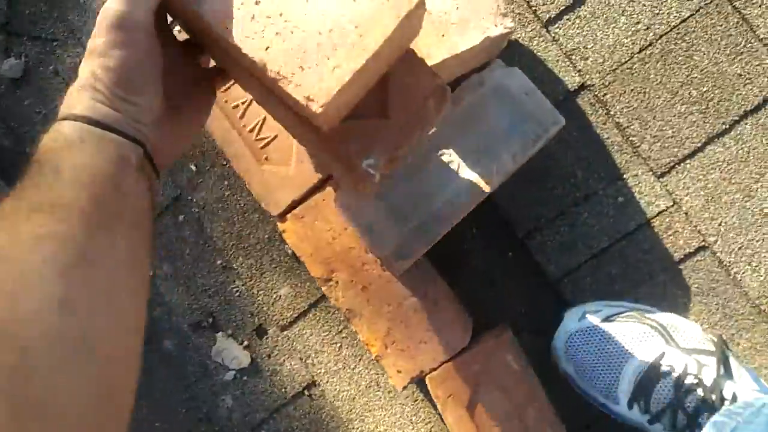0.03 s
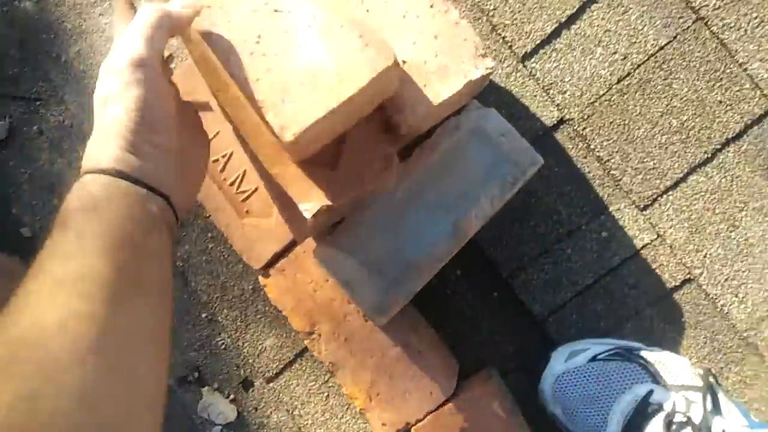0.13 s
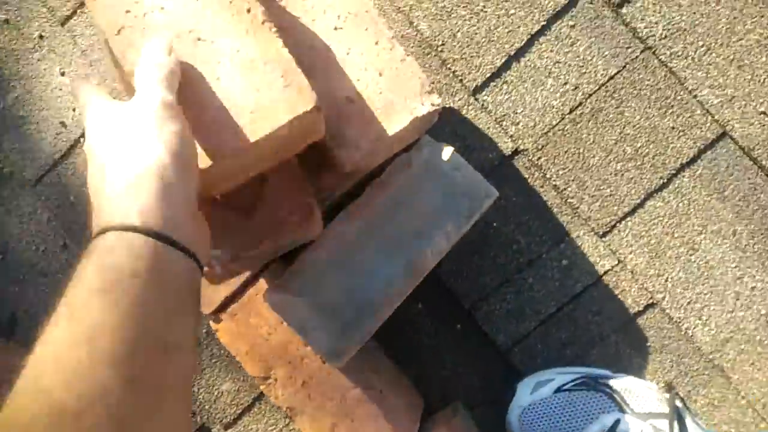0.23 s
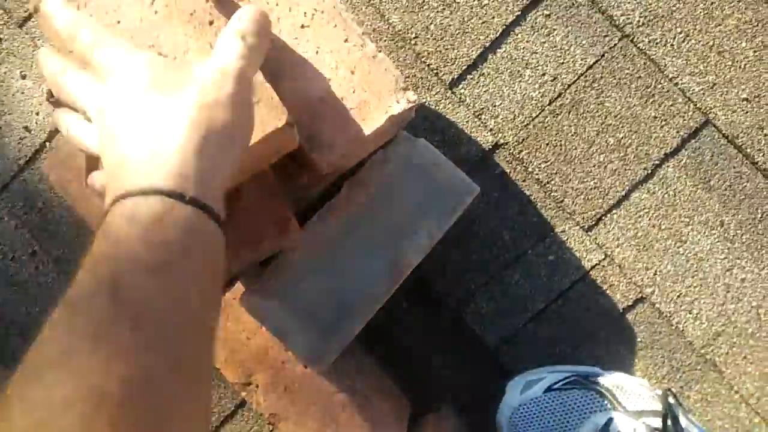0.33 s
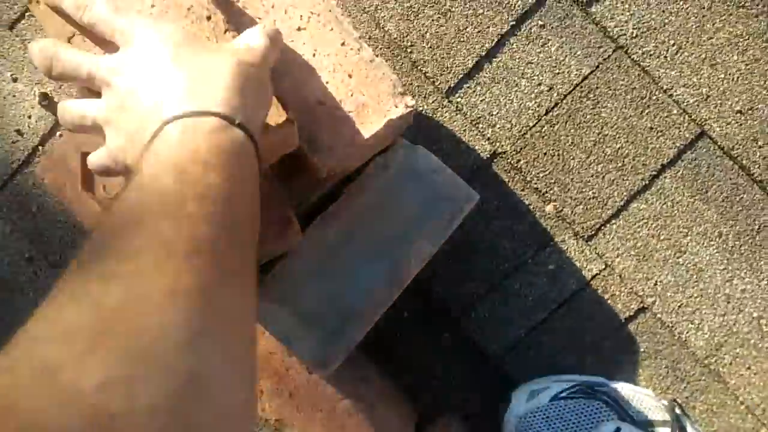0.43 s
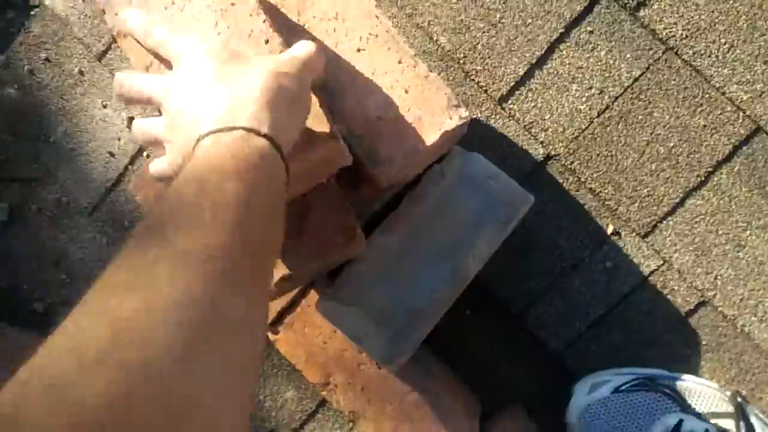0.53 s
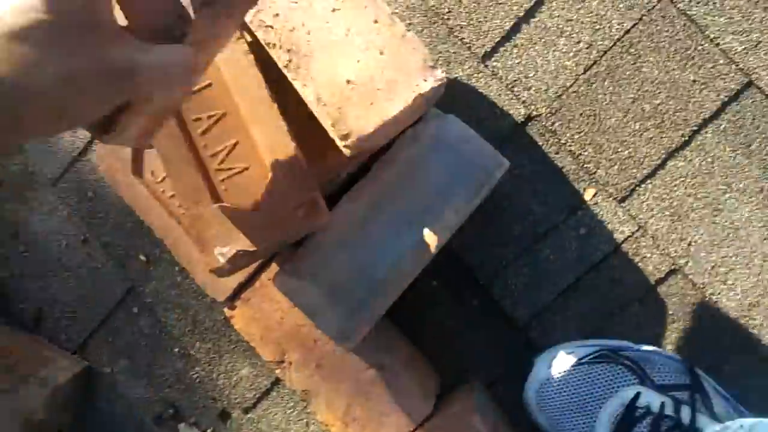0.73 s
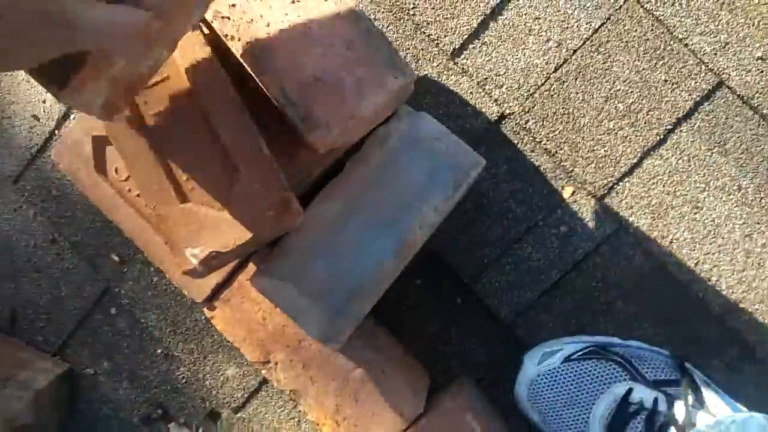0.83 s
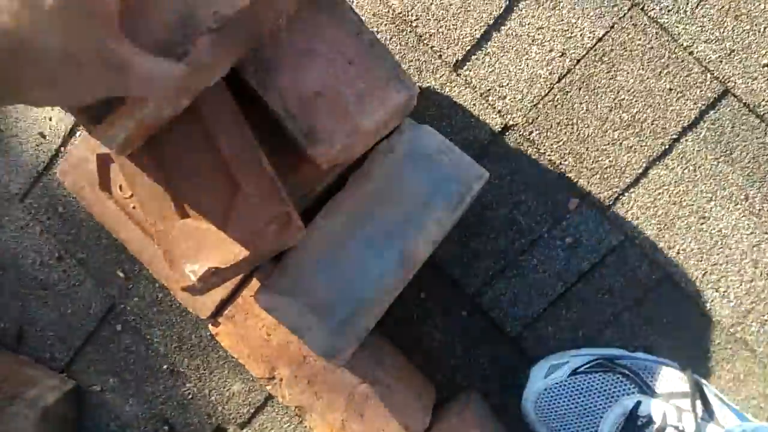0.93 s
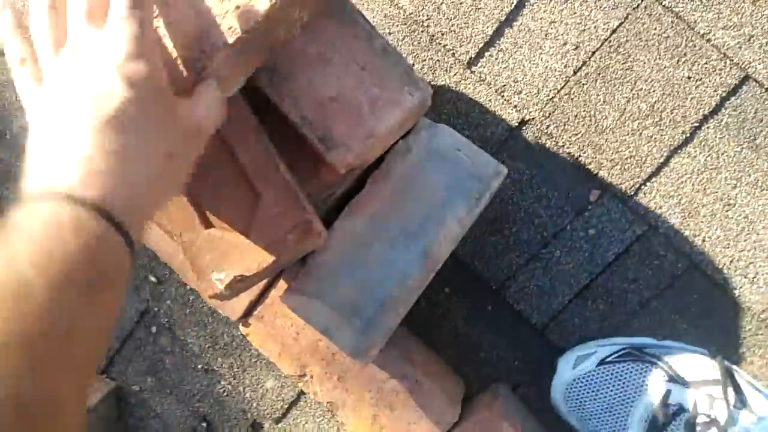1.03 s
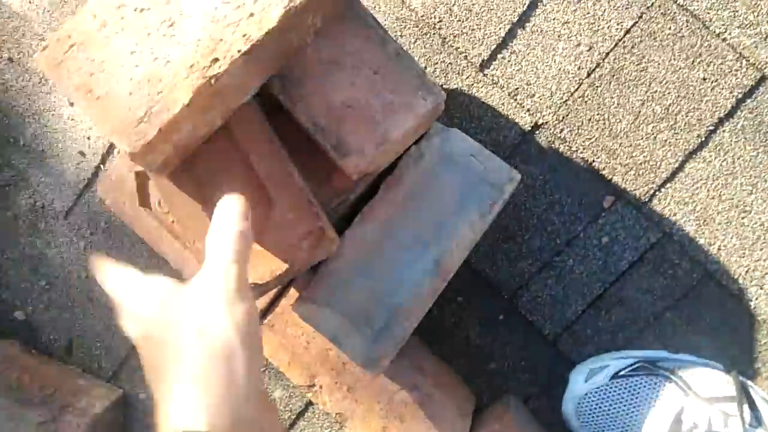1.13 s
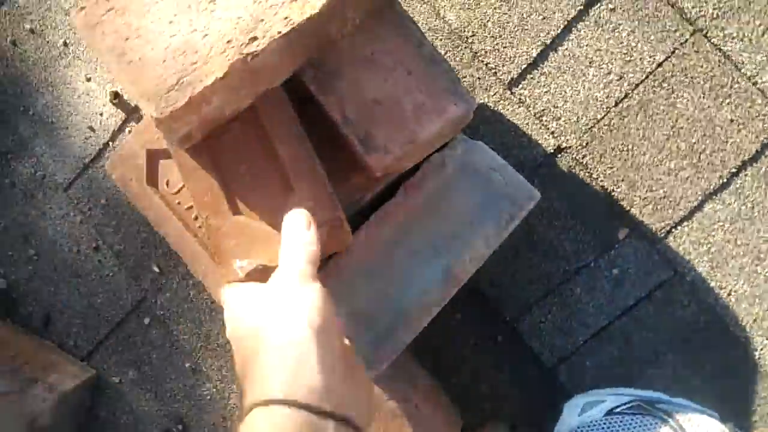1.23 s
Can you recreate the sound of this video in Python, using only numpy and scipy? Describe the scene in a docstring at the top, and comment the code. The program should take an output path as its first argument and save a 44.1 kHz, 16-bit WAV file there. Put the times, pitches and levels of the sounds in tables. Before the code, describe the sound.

Bricks knock together in two hard hollow clusters, with gritty scrapes and small ticks outdoors

```python
"""Bricks clack hollowly as hands knock and shift them on a shingled roof, close to a small microphone.
Each contact shakes damped tones in the pile and a thud in the roof; blows and rubbing ring the held brick.
Short noise bursts make grit ticks, dense clicks make scraping, and filtered noise makes a dull rustle.
Distant outdoor rumble lies below; the hardest knocks come in two groups and overload the recorder."""
import sys
import numpy as np
from scipy import signal
from scipy.io import wavfile

SR = 44100
rng = np.random.default_rng(int(sys.argv[2]) if len(sys.argv) > 2 else 0)


def materialize(psi):
    """Save the field psi as 16-bit PCM at rate SR to the path in sys.argv[1].

    A 1-D psi becomes a single channel; in a 2-D psi each row is a channel.
    """
    bounded = np.clip(np.atleast_2d(psi).T, -1, 1)
    quanta = np.round(bounded * 32767).astype(np.int16)
    wavfile.write(sys.argv[1], SR, quanta)


def undo_db(level):
    """Turn decibels back into plain size, where 20 dB means ten times bigger."""
    steps = np.asarray(level, float) / 20
    return 10 ** steps


N = 57330  # length in samples, 1.3 s

# natural tones of the held brick: pitch_hz
BRICK_PITCHES = [1500, 2774, 2802, 3000, 2999, 3144, 3334, 3754, 3972, 4166, 4277, 5718, 5814, 6505, 6676,
                 7530, 11210]
# how each of these tones responds: time to fall 60 dB when free [decay_s], struck on the face [face_db],
# on the edge [edge_db], on the corner [corner_db], and when rubbed [rubbed_db]
BRICK_RESPONSE = [(0.065, -30, -29, -31.5, -2.5), (0.17, -7, -29.5, -29, 2.5),
                  (0.097, -31.5, -9, -27.5, -20.5), (0.14, -2, 1, -18.5, -3),
                  (0.59, -44, -46.5, -46.5, -33.5), (0.14, -13, -7, -11, -9.5), (0.22, -10, -35, -2, -18),
                  (0.075, -4, -15.5, -22, -1.5), (0.07, -25, -24.5, -32, -22.5),
                  (0.17, -16, -42.5, -23, -27.5), (0.12, -24, -25.5, -25.5, -18),
                  (0.11, -28.5, -29.5, -8.5, -11.5), (0.19, -25.5, -38.5, -22, -8),
                  (.12, -34, -44.5, -13.5, -18.5), (0.094, -27.5, -34, -0.5, -15),
                  (0.063, -37.5, -45.5, -12, -9.5), (0.012, -55.5, -47.5, -12.5, -7)]


def rms_one(x):
    """Scales a sound to an average strength (rms) of 1."""
    return x / np.sqrt(np.mean(x ** 2) + 1e-20)


def in_time(rows):
    """Draws straight lines between (start_s, level_db) points."""
    s, db = np.transpose(rows)
    return np.interp(np.arange(N) / SR, s, db)


def ring(push, hz, decay_s):
    """A resonator: a unit click sets a sine of height 1 ringing, which falls 60 dB in decay_s."""
    r = undo_db(-60 / (max(decay_s, .002) * SR))
    w = 2 * np.pi * hz / SR
    return signal.lfilter([0, np.sin(w)], [1, -2 * r * np.cos(w), r * r], push + 1e-18)


def band(x, low_hz, high_hz):
    """Keeps the sound between two pitches, the upper one at most 0.45 of the sample rate."""
    sos = signal.butter(2, [low_hz, min(high_hz, .45 * SR)], "band", fs=SR, output="sos")
    return signal.sosfilt(sos, x)


def soften(x, seconds):
    """A longer contact smears the push."""
    r = np.exp(-1 / (seconds * SR))
    return signal.lfilter([1 - r], [1, -r], x)


def drift(rate_hz):
    """Slow random wandering with an rms of 1, from noise smoothed above rate_hz."""
    r = np.exp(-2 * np.pi * rate_hz / SR)
    settled = signal.lfilter([1], [1, -2 * r, r * r], rng.standard_normal(N + SR))[SR:]
    return rms_one(settled)


def colour(sources, spectrum, flicker_db):
    """Half-octave bands, taken in turn from two sources, each with its own level and flicker; rms 1."""
    hz, db = np.transpose(spectrum)
    borders = 30 * 2 ** np.arange(0, 9.6, .5)
    total = np.zeros(N)
    for k, (low, high) in enumerate(zip(borders, borders[1:])):
        band_db = np.interp(np.log(low * high) / 2, np.log(hz), db)
        total += undo_db(band_db + flicker_db * drift(45)) * band(sources[k % 2], low, high)
    return rms_one(total)


def grains():
    """Two streams of dense clicks of uneven size and sign, like grit giving way."""
    per_s, spread_db = 13000, 2.5
    sizes = undo_db(spread_db * np.minimum(rng.exponential(1, (2, N)), 4))
    signs = rng.choice([-1, 1], (2, N))
    return sizes * signs * (rng.random((2, N)) < per_s / SR)


def add(out, s, sound):
    """Mixes a short sound in, starting at s seconds."""
    i = int(s * SR)
    out[i:i + len(sound)] += sound[:N - i]


def clacks():
    """A click and short rattle set off the pile's damped hollow tones, a bright crack and a roof thud."""
    # contacts in the pile: start_s, clack_db, base pitch [pitch_hz], base ring time [decay_s], thud_db
    contacts = [(0.1572, -20.5, 1080, 0.016, -28.5), (0.183, -18.5, 880, 0.022, -33),
                (.194, -11, 1020, 0.012, -36), (0.2041, 11.5, 1356, 0.048, 6),
                (0.2102, 8, 1418, 0.055, -14), (.220, 17, 1379, 0.031, 0), (.228, 6, 1100, 0.011, -18),
                (0.2352, 9, 1130, 0.011, -22), (.239, 1, 1244, 0.016, -27.5), (0.25, -30, 904, .02, -22),
                (.262, -26.5, 1017, 0.05, -28.5), (.280, -14.5, 1190, 0.023, -22.5),
                (.298, -20, 830, 0.016, -26), (0.381, -36.5, 780, 0.082, -25),
                (.394, -34, 970, 0.048, -31.5), (.402, -23, 880, 0.018, -29.5),
                (0.4425, -14, 1197, 0.027, -27.5), (.450, -15.5, 1026, 0.026, -28),
                (0.4571, -21, 900, 0.011, -27), (0.512, -30.5, 1090, 0.012, -41),
                (0.5383, -12.5, 1000, .016, -29.5), (0.5412, -24.5, 940, 0.014, -24.5),
                (.649, -30.5, 1500, 0.024, -42), (0.6548, -20.5, 922, 0.023, -23),
                (0.9385, -14, 794, 0.01, -39.5), (0.9403, -11, 2000, 0.0095, -36.5),
                (.990, 4.5, 1300, 0.025, -14.5), (0.9941, 5.5, 1226, 0.022, -23.5),
                (1.0011, 5.5, 1139, 0.014, -17), (1.0094, 8, 1388, 0.029, -27.5),
                (1.0168, -3, 1102, 0.037, -38.5), (1.034, -8.5, 1050, 0.021, -28.5),
                (1.118, -32.5, 2310, 0.015, -48), (1.126, -36.5, 2550, 0.021, -57),
                (1.135, -35, 2352, 0.019, -39)]
    # hollow tones of the pile: pitch_ratio to the base, level_db, share of the base ring time [ratio]
    hollow_tones = [(.55, -9.5, 0.41), (.75, -3.5, .7), (1.01, 2, 0.49), (1.22, -2, 0.46), (1.6, -13, 0.39),
                    (2.1, -14, 0.12)]
    # tones of the roof under the pile: pitch_hz, level_db, time to fall 60 dB [decay_s]
    roof_tones = [(163, -4.5, 0.035), (239, -1, 0.025), (366, 2, 0.027), (504, -4.5, 0.02)]
    rattle_db, rattle_share = 3, 0.19  # level; rattle length as a share of the base ring time
    crack_db, crack_fade_s = -23.5, 0.0023
    contact_s, softer_when_weak = .00004, 0.2  # contact time at 0 dB; it grows as blows weaken
    out, t = np.zeros(N), np.arange(SR // 8) / SR
    for s, db, base_hz, base_decay_s, thud_db in contacts:
        noise = rng.standard_normal((2, len(t)))
        rattle_s = rattle_share * base_decay_s
        rattle = noise[0] * np.exp(-(t / rattle_s) ** 2) / np.sqrt(rattle_s * SR)
        push = (t == 0) + undo_db(rattle_db) * rattle
        push = soften(push, contact_s * undo_db(-softer_when_weak * db))
        body = np.zeros(len(t))
        for k, (ratio, tone_db, share) in enumerate(hollow_tones):
            sign = (-1) ** (k + 1)  # neighbours start in opposite directions
            body += sign * undo_db(tone_db) * ring(push, base_hz * ratio, base_decay_s * share)
        crack = undo_db(crack_db) * band(noise[1], 2000, 7400) * np.exp(-t / crack_fade_s)
        soft = soften(push, .0006)  # the roof feels a slower push
        thud = np.zeros(len(t))
        for k, (hz, tone_db, decay_s) in enumerate(roof_tones):
            thud += (-1) ** k * undo_db(tone_db) * ring(soft, hz, decay_s)
        add(out, s, undo_db(db) * (body + crack) + undo_db(thud_db) * thud)
    return out


def struck_brick():
    """The spot struck sets the mix of tones; each new blow on the held brick damps the ring of earlier blows."""
    # blows on the held brick: start_s, force on face [face_db], on edge [edge_db], on corner [corner_db]
    blows = [(0.159, -67, -64, -28), (0.185, -45, -55, -32.5), (0.2046, -14, -64.5, -19),
             (0.229, -5.5, -47, -23.5), (0.2492, -11, -24.5, -36), (0.444, -43, -50, -69),
             (0.991, -47.5, -5, -45.5), (1.0038, -51, -13, -51.5), (1.011, -25.5, 1, -44.5)]
    spread_db = 1.2  # chance unevenness of each tone
    rise_s, left_ringing = 0.0014, 0.33  # onset time; share of a ring that survives each later blow
    sag_hz, sag_s, bending_top_hz = 28, .035, 3200  # bending tones start flat and rise as they fade
    out, age = np.zeros(N), np.arange(SR // 3) / SR
    starts, count = np.transpose(blows)[0], len(BRICK_RESPONSE)
    hz = np.array(BRICK_PITCHES)[:, None]
    response = np.array(BRICK_RESPONSE)
    # cycles lost so far by starting flat
    sag = (hz < bending_top_hz) * sag_hz * sag_s * (1 - np.exp(-age / sag_s))
    tones = np.sin(2 * np.pi * (hz * age - sag)) * undo_db(-60 * age / response[:, :1])
    for s, *spots_db in blows:
        height = undo_db(response[:, 1:4] + spots_db).sum(axis=1)
        height = height * undo_db(spread_db * rng.standard_normal(count))
        ringing = (height * (-1) ** np.arange(count)) @ tones
        later_blows = np.searchsorted(starts, s + age, "right") - np.searchsorted(starts, s, "right")
        add(out, s, ringing * left_ringing ** later_blows * (1 - np.exp(-age / rise_s)))
    return out


def rubbed_brick():
    """Brick rubs on brick: dense clicks drive the brick's tones, which ring shorter while pressed."""
    # strength of the rubbing before flicker: start_s, level_db
    rubbing = [(.15, -93), (.16, -43), (.24, -51), (.285, -37.5), (.315, -39.5), (.335, -57), (.38, -54),
               (.43, -52), (.48, -63), (.58, -71), (.597, -43.5), (.63, -42), (.655, -41.5), (.67, -51.5),
               (.74, -65), (.8, -81.5), (1.3, -72)]
    damping, flicker_db = 0.63, 1.5  # share of the free ring time that is left; unevenness
    drive = undo_db(in_time(rubbing) + flicker_db * drift(27)) * rms_one(grains()[0])
    out = np.zeros(N)
    for hz, (decay_s, *_, rubbed_db) in zip(BRICK_PITCHES, BRICK_RESPONSE):
        short_s = decay_s * damping
        # long rings build up more, so they are scaled down
        out += undo_db(rubbed_db) * ring(drive, hz, short_s) / np.sqrt(short_s * SR / 10)
    return out


def grit_ticks():
    """Grains of grit crack: a very short noise burst, strongest around its centre."""
    # single cracks: start_s, peak_db, centre_hz
    cracks = [(0.0184, -35.5, 5690), (0.0256, -35.5, 5600), (0.0376, -39, 5800), (0.0488, -26.5, 5400),
              (0.0634, -33, 5900), (0.0678, -35.5, 5696), (0.084, -41, 5900), (0.096, -37, 5350),
              (0.1132, -31, 6470), (0.1179, -20, 4830), (.158, -29, 3400), (.184, -31, 4300),
              (.314, -24, 4900), (0.3318, -30, 7200), (0.3675, -30, 6000), (0.379, -29, 3160),
              (0.3917, -27.5, 3370), (0.4411, -24.5, 4050), (0.4512, -28.5, 5800), (0.5134, -29, 5700),
              (0.5195, -30, 5350), (0.5574, -49, 5160), (0.5631, -37.5, 5630), (0.5896, -36.5, 5500),
              (0.5964, -37, 5900), (0.6466, -26, 3400), (0.8142, -46.5, 4670), (0.9165, -39, 13400),
              (0.9394, -28.5, 7640), (1.1174, -38.5, 5200), (1.1528, -54, 7000), (1.2754, -36.5, 2600),
              (1.2893, -30, 7410)]
    fade_s, width, broad_db = 0.0017, 0.18, -5  # fade time; half width as share of centre; wide part
    out, t = np.zeros(N), np.arange(SR // 50) / SR
    for s, db, hz in cracks:
        noise = rng.standard_normal(len(t)) * np.exp(-t / fade_s)
        narrow = 2 * band(noise, hz * (1 - width), hz * (1 + width))
        burst = narrow + undo_db(broad_db) * band(noise, 1300, .45 * SR)
        add(out, s, undo_db(db) * burst / np.abs(burst).max())
    return out


def add_echoes(hits):
    """Roof and pile throw back duller, weaker copies of the hits."""
    # echo paths: delay_s, level_db
    bounces = [(.004, -14), (.009, -25.5), (0.018, -36), (.031, -41.5)]
    dull = band(hits, 110, 4500)
    for s, db in bounces:
        add(hits, s, undo_db(db) * dull)
    return hits


def scraping():
    """Gritty scraping: dense clicks shaped into a bright, flickering hiss."""
    # strength of the scraping: start_s, level_db
    strength = [(0, -54.5), (.11, -58.5), (.15, -49.5), (.16, -43.5), (.24, -36.5), (.3, -52), (.4, -51.5),
                (.5, -53.5), (.58, -55), (.6, -47), (.65, -55), (.67, -57.5), (.73, -59), (.75, -63.5),
                (.93, -84), (.942, -39), (.955, -45.5), (.985, -47), (1.03, -45.5), (1.1, -53.5),
                (1.2, -71.5), (1.3, -84)]
    # tone of the grit, relative levels: pitch_hz, level per Hz [level_db]
    tone = [(600, -16.5), (1200, 4), (2500, 3), (4000, 0.5), (6000, 2.5), (7500, -0.5), (9300, -14),
            (11200, -4), (14000, -9.5), (16000, -4)]
    return undo_db(in_time(strength)) * colour(grains(), tone, flicker_db=3.5)


def shifting():
    """Handling shakes the pile and roof: a dull rustle of noise that swells and flickers."""
    # strength of the rustle before flicker: start_s, level_db
    strength = [(0, -51.5), (.15, -57), (.3, -41.5), (.36, -51), (.4, -48), (.48, -56.5), (.58, -48.5),
                (.64, -45.5), (.72, -53.5), (.85, -61.5), (1.0, -54.5), (1.3, -56)]
    rustle = rms_one(band(rng.standard_normal(N), 153, 1300))
    return undo_db(in_time(strength) + 3 * drift(30)) * rustle


def rumble():
    """Distant outdoor rumble: steady noise, mostly low, with a slight flicker in each band."""
    # tone of the rumble, relative levels: pitch_hz, level per Hz [level_db]
    # and its overall level [level_db]
    tone, overall_db = [(24, -53.5), (40, -24.5), (97, 2.5), (288, 1), (479, -29), (746, -7), (3370, -35),
                        (4600, -28), (8000, -47), (10400, -74), (17600, -120)], -52
    return undo_db(overall_db) * colour(rng.standard_normal((2, N)), tone, flicker_db=2.5)


def scene():
    """Hits with their echoes, over scraping, rustle and rumble; one channel."""
    hits = add_echoes(clacks() + struck_brick() + rubbed_brick() + grit_ticks())
    return (hits + scraping() + shifting() + rumble())[None]


def band_limit(x):
    """A steep low-pass at the top of the band."""
    return signal.sosfilt(signal.butter(12, 16460, fs=SR, output="sos"), x)


def record(dry):
    """The small microphone loses bass, overload flattens the peaks, and the top is cut."""
    ceiling, hardness = .83, 7  # highest level before the top is cut; higher hardness bends more sharply
    bass_cut = signal.butter(2, 119, "high", fs=SR, output="sos")
    x = signal.sosfilt(bass_cut, dry) / ceiling
    x = ceiling * x / (1 + np.abs(x) ** hardness) ** (1 / hardness)
    top_cut = signal.cheby2(20, 60, 16500, fs=SR, output="sos")
    return band_limit(signal.sosfilt(top_cut, x))


dry = scene()
out = record(dry)
materialize(out)
```